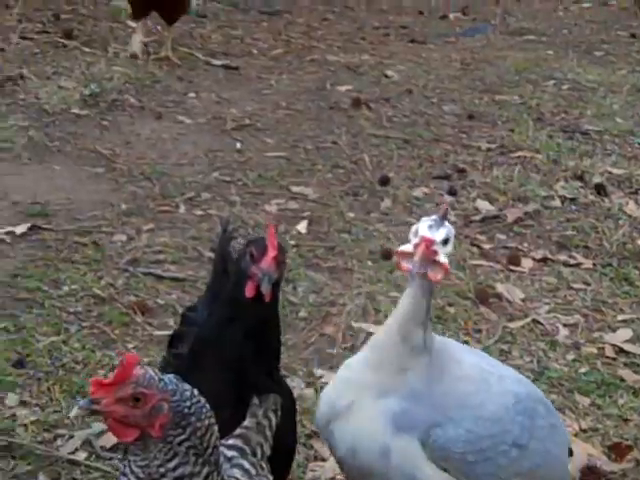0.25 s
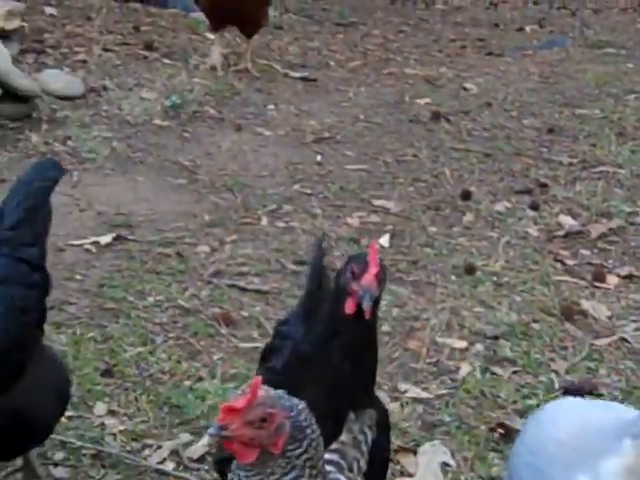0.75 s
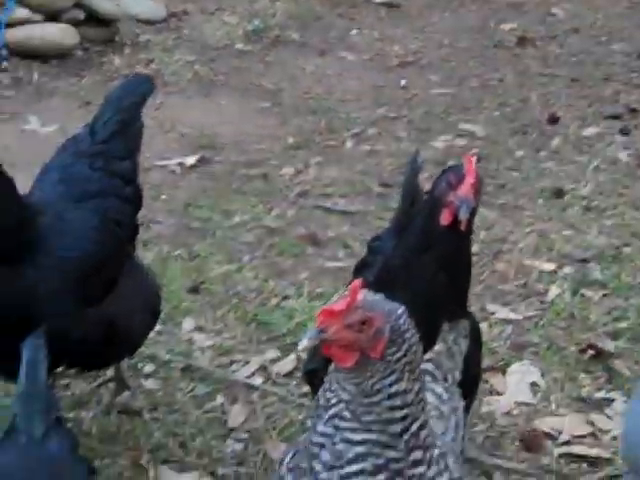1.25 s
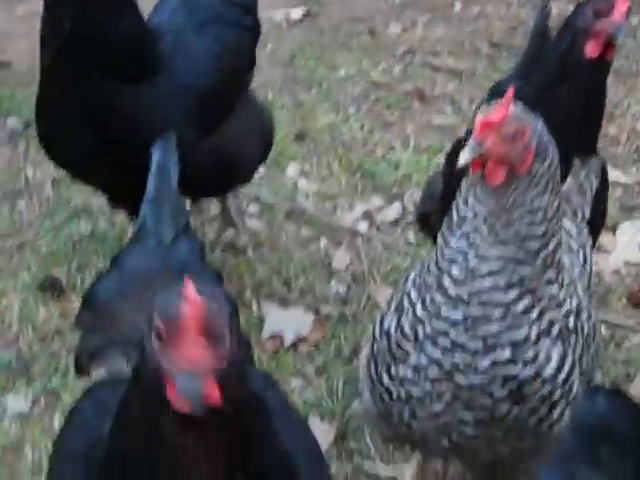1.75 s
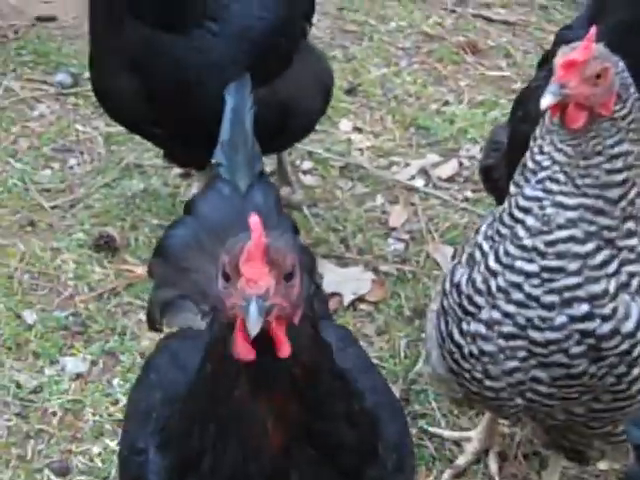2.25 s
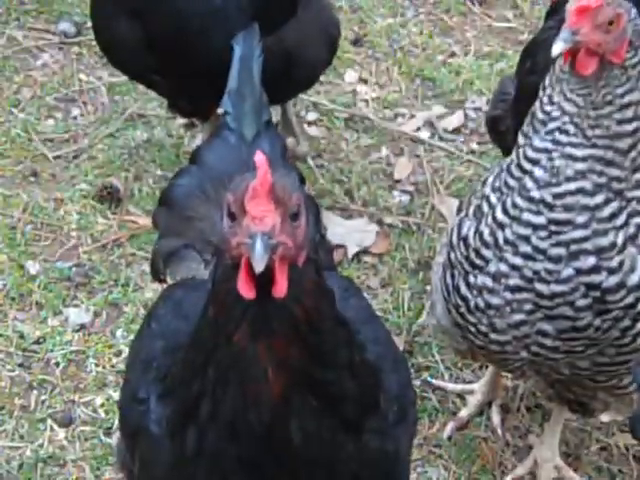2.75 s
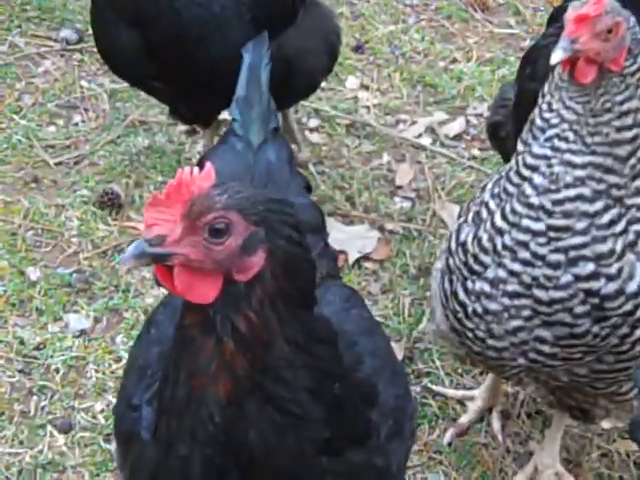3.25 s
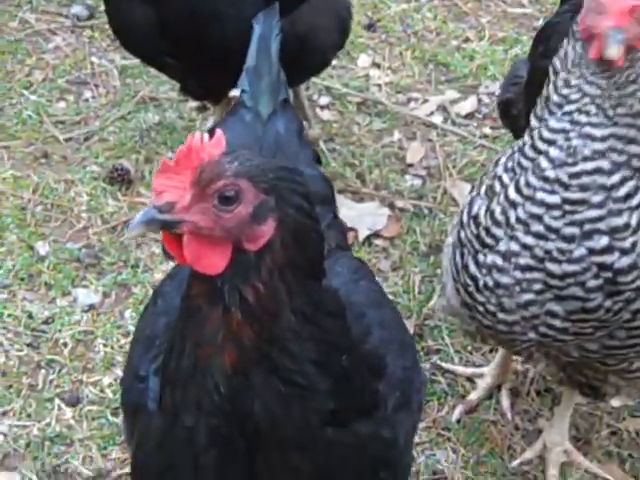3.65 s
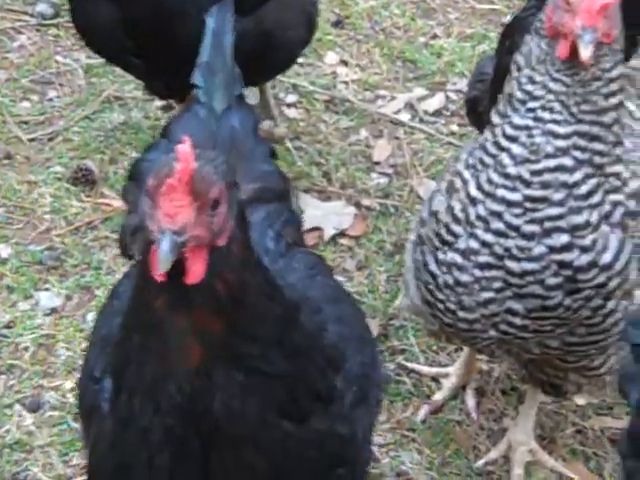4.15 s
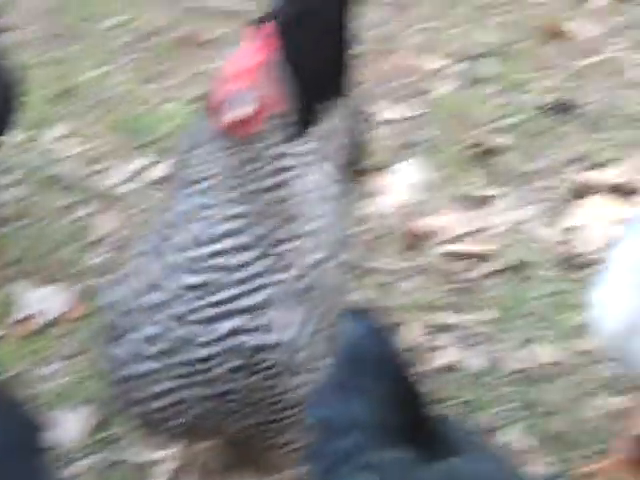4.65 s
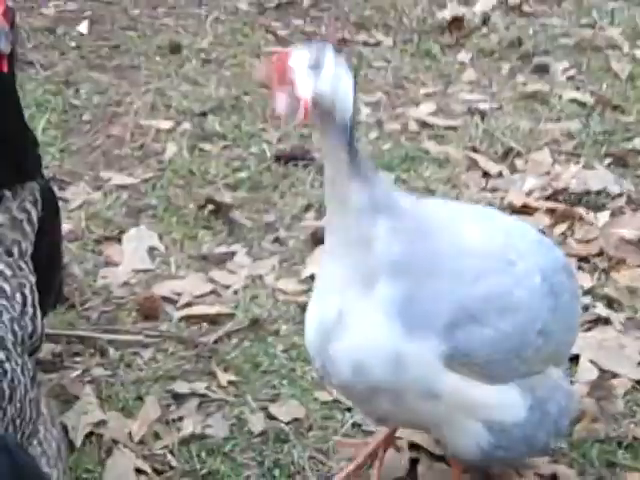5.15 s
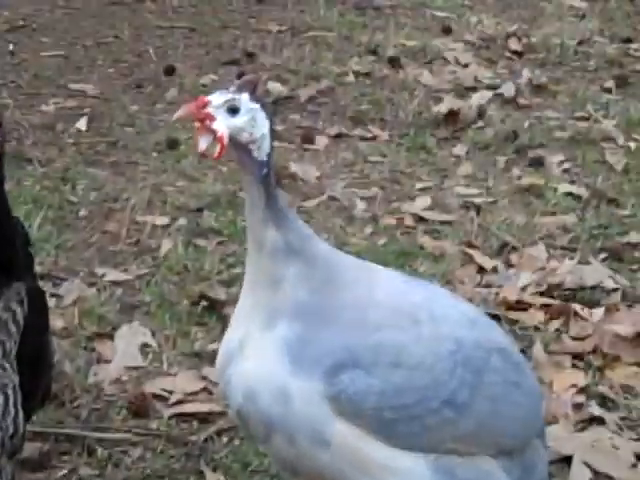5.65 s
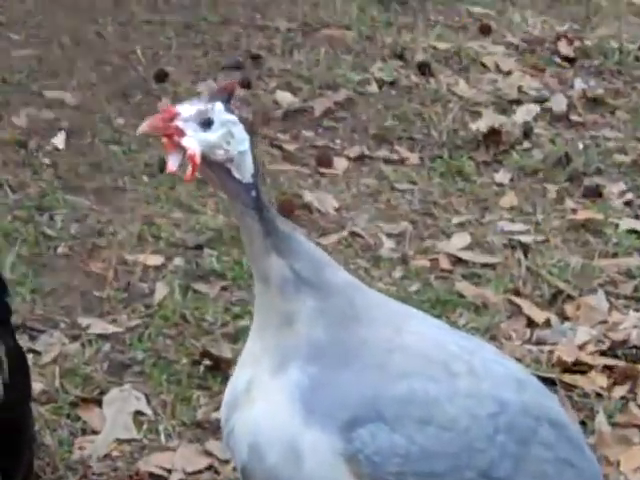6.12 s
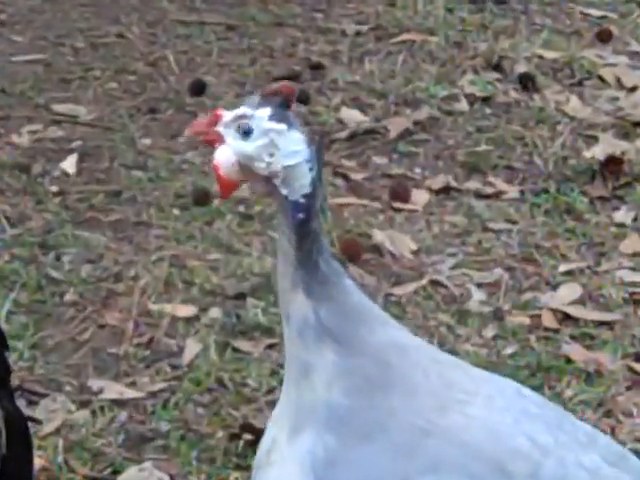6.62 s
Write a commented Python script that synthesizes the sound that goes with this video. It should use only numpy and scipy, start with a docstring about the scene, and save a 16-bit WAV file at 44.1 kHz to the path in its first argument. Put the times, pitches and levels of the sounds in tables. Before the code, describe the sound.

A guineafowl gives sharp metallic chinks and then a run of dry rasps while hens cluck and whine softly over rustling dead leaves.

```python
"""Guineafowl and hens on leaf litter

A guineafowl's thin whistles climb into sharp metallic chinks; a run of dry rasps is clicks through a throat.
Hens cluck, peep, growl, squawk and whine: harmonics of a rough syrinx, filtered by a throat.
Feet rustle in dead leaves (uneven clicks) over a low distant rumble (shaped noise).
The yard returns a faint echo, and two microphone ports hear it all in stereo."""
import sys
import numpy as np
from scipy import signal
from scipy.fft import rfft, irfft, next_fast_len
from scipy.io import wavfile

SR = 44100
rng = np.random.default_rng(int(sys.argv[2]) if len(sys.argv) > 2 else 0)


def wav_record(signal):
    """Record a signal, one row per channel, as 16-bit PCM in the file named by sys.argv[1]."""
    frames = np.transpose(np.atleast_2d(signal))
    bounded = np.clip(frames, -1, 1)
    # unit amplitude maps onto the largest positive 16-bit level
    quanta = np.round(bounded * 32767).astype(np.int16)
    wavfile.write(sys.argv[1], SR, quanta)


N = 303408


def undb(db):
    """Decibels to gain."""
    return 10 ** (np.asarray(db) / 20)


def unit(x):
    """Scale to rms 1."""
    return x / np.sqrt(np.mean(x ** 2) + 1e-18)


def shape_db(hz, points):
    """Read a spectrum on a log-frequency axis."""
    point_hz, point_db = np.transpose(points)
    return np.interp(np.log(np.maximum(hz, 1)), np.log(point_hz), point_db)


def response(points, size=1024):
    """Gain and phase of a causal (minimum-phase) filter with the given spectrum."""
    gain = undb(shape_db(np.fft.rfftfreq(size, 1 / SR), points))
    cepstrum = irfft(np.log(gain))
    cepstrum[1:size // 2] *= 2
    cepstrum[size // 2 + 1:] = 0
    return np.exp(rfft(cepstrum))


def colour(x, points):
    """Filter x with the given spectrum."""
    return signal.fftconvolve(x, irfft(response(points)))[:len(x)]


def wander(n, rate_hz):
    """Smooth chance with spread near 1, taking a new target rate_hz times a second."""
    place = np.arange(n) * rate_hz / SR
    return 1.23 * np.interp(place, np.arange(n), rng.standard_normal(n))


def crackle(n, spread_db):
    """Dense tiny clicks of very unequal size."""
    size_db = spread_db * np.minimum(rng.exponential(size=n), 2 * np.pi)
    return unit(rng.standard_normal(n) * undb(size_db))


def arch(u, start, middle, end):
    """Parabola through three values as u goes from 0 to 1."""
    return start * (1 - u) * (1 - 2 * u) + 4 * middle * u * (1 - u) + end * u * (2 * u - 1)


def add(out, start_s, x):
    """Mix x into out from start_s."""
    i = max(int(start_s * SR), 0)
    out[..., i:i + x.shape[-1]] += x[..., :max(N - i, 0)]


def ports(x, lag):
    """A sound from the right reaches the left port lag samples later."""
    size = next_fast_len(len(x) + 64)
    delay = np.exp(-2j * np.pi * np.fft.rfftfreq(size) * lag)
    late = irfft(rfft(x, size) * delay, size)
    return np.array([late[:len(x)], x])


def voice(hz, throat, rough, tilt_db=0, overtones_db=0, jitter=0.027, shimmer=0.2, half=0.13, count=16):
    """Harmonics of a syrinx through a throat; roughness shakes the cycles and alternates strong and weak."""
    shake, flutter = (np.resize(wander(SR // 4, np.mean(hz)), len(hz)) for _ in range(2))
    phase = 2 * np.pi * np.cumsum(hz * (1 + jitter * rough * shake)) / SR
    k = np.arange(1, count + 1)[:, None]
    tract = response(throat)
    tract_hz = np.linspace(0, SR / 2, len(tract))
    source_gain = undb(tilt_db * np.log2(k) + overtones_db * (k > 1))
    gain = np.interp(k * hz, tract_hz, tract, right=0) * source_gain
    tone = np.sum(gain * np.exp(1j * k * phase), axis=0).real
    # cos(phase / 2) makes every other cycle weaker
    return unit(tone * (1 + rough * (shimmer * flutter + half * np.cos(phase / 2))))


# guineafowl throat: freq_hz, gain_db
GUINEA_THROAT = [(500, -35), (900, -21), (1250, -1.5), (1800, -24), (2500, 0), (3700, 0), (4900, -10.5),
                 (6200, -13), (7200, -19), (8500, -10), (10200, -33), (15000, -54)]
# turbulent air in the guineafowl's call: freq_hz, gain_db
GUINEA_HISS = [(500, -22), (1600, -12), (2100, -14), (2900, 0), (4500, -1), (6000, -12), (8500, -9),
               (10500, -24), (15000, -40)]


def guinea_hiss(n):
    """Breath turbulence: noise coloured by the call's own spectrum."""
    return unit(colour(rng.standard_normal(SR // 8), GUINEA_HISS))[:n]


# thin whistles, most leading into a chink: start_s, length_s, start_hz, top_hz, end_hz, level_db, swell_db
WHISTLES = [(0.601, 0.021, 1785, 2320, 2650, -24, 26), (1.561, .040, 1838, 3310, 3288, -12, 29),
            (2.16, .044, 5900, 7460, 5140, -49, 0), (3.269, .039, 1694, 3453, 3933, -14, 22),
            (4.997, 0.019, 3600, 3882, 3000, -28, 24), (6.707, 0.038, 1900, 3450, 3330, -9.5, 33)]
WHISTLE_HISS_DB = -19
UNDERTONE_HZ, UNDERTONE_DB = 1470, -20  # the other side of the syrinx


def whistles():
    """A near-sine follows a pitch arch and swells, with faint overtones, a fixed undertone and hiss."""
    out = np.zeros(N)
    for start_s, length_s, start_hz, top_hz, end_hz, level_db, swell_db in WHISTLES:
        u = np.linspace(0, 1, int(length_s * SR))
        hz = arch(u, start_hz, top_hz, end_hz) * (1 + .016 * wander(len(u), 1500))
        phase = 2 * np.pi * np.cumsum(hz) / SR
        gate = np.clip(np.minimum(u, 1 - u) / .1, 0, 1)
        # stutters at first, steadies towards the end
        swell = undb(level_db + (u - 1) * (swell_db + 4 * wander(len(u), 600))) * gate
        tone = np.sin(phase) + undb(UNDERTONE_DB) * np.sin(2 * np.pi * UNDERTONE_HZ * u * length_s)
        for k in (2, 3):
            gain = undb(shape_db(k * hz, GUINEA_THROAT) / 2 - 4.5 * k)
            tone += gain * np.sin(k * phase) * (k * hz < SR / 2)
        add(out, start_s, swell * (np.sqrt(2) * tone + undb(WHISTLE_HISS_DB) * guinea_hiss(len(u))))
    return out


# chinks: start_s, length_s, attack_hz, held_hz, level_db, peak_place_0_to_1, overtones_db,
# brightness_db_per_octave, rasp_0_to_1, echo_db
CHINKS = [(0.616, 0.029, 1330, 1285, -16, 0.5, -6, -1.5, 0.15, -4),
          (1.598, .017, 1285, 1215, -10.3, 0.32, -4, 2.3, 0.3, -6),
          (3.304, 0.022, 1496, 1195, -8, 0.27, -11.5, 3.2, 0.15, -7),
          (4.762, 0.034, 1262, 1246, -11.7, 0.54, 1.5, -1.5, 0.06, -9),
          (5.013, 0.017, 1600, 1290, -20, .5, -3.5, 3.2, 0.18, 8),
          (6.742, 0.02, 1480, 1200, -8.2, 0.27, -11.5, 4.2, 0.3, -5)]
CHINK_HISS_DB = -3  # at rasp 1


def chinks():
    """Short hoarse notes: pitch settles from attack to held; returns the notes and their send to the yard."""
    out, thrown = np.zeros((2, N))
    for start_s, length_s, attack_hz, held_hz, level_db, peak, overtones_db, bright_db, rasp, echo_db in CHINKS:
        u = np.linspace(0, 1, int(length_s * SR))
        hz = held_hz + (attack_hz - held_hz) * np.exp(-u / .27)
        swell = np.sin(np.pi * np.interp(u, [0, peak, 1], [0, .5, 1])).clip(0) ** 1.3
        tone = voice(hz, GUINEA_THROAT, rasp, bright_db, overtones_db,
                     jitter=0.1, shimmer=0.66, half=0.1, count=10)
        breath = rasp * undb(CHINK_HISS_DB) * guinea_hiss(len(u))
        note = undb(level_db) * swell * (tone + breath)
        add(out, start_s, note)
        # a call aimed away from the ports puts more into the yard
        add(thrown, start_s, undb(echo_db) * note)
    return out, thrown


def guineafowl():
    """Thin whistles and loud chinks about a third as high, with their own yard echo."""
    whistle = whistles()
    chink, thrown = chinks()
    thrown = thrown + undb(-13) * whistle
    echo = yard(ports(thrown, lag=0), early_db=-21.5, late_db=-27.5, early_t60=.1, late_t60=0.7)
    return ports(whistle + chink, lag=2.9) + echo


# dry rasps, the first four the ragged noise and scuffle around the squawk:
# start_s, rise_s, hold_s, decay_s, level_db, throat_ring_hz, ring_db
RASPS = [(4.102, 0.0012, 0.058, 0.0085, -32.5, 3080, -7), (4.114, 0.002, 0.007, 0.018, -24.5, 880, 20),
         (4.117, 0.001, 0.0023, 0.0029, -15.5, 2870, 16), (4.15, 0.001, 0.0029, 0.0013, -19.5, 2500, -4),
         (4.3411, 0.0011, 0.009, 0.007, -19, 1720, -8), (4.5436, 0.0015, 0.0028, 0.012, -17.3, 2050, -13),
         (4.7426, 0.0003, 0.013, 0.0024, -19, 2400, -7), (4.9602, 0.0019, 0.005, 0.011, -18.5, 2200, -7.5),
         (5.1925, 0.0004, 0.007, 0.008, -18, 2120, -4), (5.446, 0.041, 0.014, 0.009, -26, 2110, -2)]
# hiss of a rasp: freq_hz, gain_db
RASP_HISS = [(150, -49), (600, -11), (1000, -9), (1500, -5), (3300, -8), (4500, 1.5), (5400, 1.5),
             (6500, 7), (8200, 0.5), (10000, -5.5), (12000, -27), (15000, -42)]
RASP_FLUTTER_HZ, RASP_LAG_SAMPLES = 330, 3.1  # typical puff rate; lateness at the left port


def rasps():
    """Toneless harsh bursts: uneven puffs of clicks give a bright hiss and ring one resonance."""
    out, t = np.zeros((2, N)), np.arange(SR // 7) / SR
    for start_s, rise_s, hold_s, decay_s, level_db, ring_hz, ring_db in RASPS:
        attack = undb(level_db) * np.minimum(t / rise_s, 1) ** 1.06
        release = np.exp(-np.maximum(t - rise_s - hold_s, 0) / decay_s)
        flutter_hz = RASP_FLUTTER_HZ * np.exp(0.083 * wander(len(t), 300))
        cycle = np.cumsum(flutter_hz) / SR % 1
        puffs = unit(undb(-16 * cycle))
        clicks = crackle(len(t), 1.2) * puffs * undb(1.5 * wander(len(t), 900))
        throat = signal.iirpeak(ring_hz, 2.1, fs=SR)
        ring = unit(signal.lfilter(*throat, signal.lfilter(*throat, clicks)))
        # the hiss cracks first, the ring builds up behind it
        ring = undb(ring_db + 2.5) * (1 - np.exp(-t / .003)) * ring
        sound = release * (unit(colour(clicks, RASP_HISS)) + ring)
        # hiss scattered off the ground, different at each port
        scatter = np.array([unit(colour(rng.standard_normal(len(t)), RASP_HISS)) for _ in range(2)])
        direct = ports(attack * sound / np.hypot(1, undb(ring_db)), RASP_LAG_SAMPLES)
        add(out, start_s, direct + undb(-6) * attack * release * scatter)
    return out


HEN_ATTACK_S, HEN_RELEASE_S, QUIVER_SHARE, QUIVER_DB = 0.0012, 0.003, 0.014, 1.9


def hen_note(length_s, start_hz, end_hz, level_db, swell_db, throat, bend, rough, tilt_db):
    """One hen note: the pitch bends from start to end and quivers along with the loudness."""
    u = np.linspace(0, 1, int(length_s * SR))
    attack = np.clip(u * length_s / HEN_ATTACK_S, 0, 1)
    release = np.clip((1 - u) * length_s / HEN_RELEASE_S, 0, 1)
    quiver = wander(len(u), 40)
    hz = (start_hz + (end_hz - start_hz) * u ** bend) * (1 + QUIVER_SHARE * quiver)
    note = voice(hz, throat, rough, tilt_db=tilt_db, jitter=.12, shimmer=1.0, half=0.67, count=24)
    return note * attack * release * undb(level_db + swell_db * (u - .5) + QUIVER_DB * quiver)


# gruff clucks, and last a small peck or tick: start_s, length_s, start_hz, end_hz, level_db, swell_db
CLUCKS = [(0.238, 0.052, 650, 830, -33, -10), (0.37, 0.033, 560, 620, -32.5, -3),
          (0.506, 0.033, 328, 430, -32.5, -8), (0.654, 0.04, 335, 430, -34, -11),
          (0.882, 0.035, 335, 490, -30, -5), (1.03, 0.034, 338, 560, -29, 0),
          (1.139, 0.02, 436, 480, -40, -12), (1.208, 0.035, 355, 590, -26, 4),
          (5.69, 0.008, 520, 450, -35, -8)]
# falling squeaks, most at the end of a cluck: start_s, length_s, start_hz, end_hz
SQUEAKS = [(0.403, 0.023, 950, 790), (0.537, 0.038, 1040, 780), (0.774, 0.03, 970, 500),
           (0.915, 0.026, 1130, 760), (1.062, 0.03, 1080, 520), (1.242, 0.022, 1050, 590)]
# clear peeps: start_s, length_s, start_hz, end_hz, level_db, swell_db
PEEPS = [(0.693, 0.066, 760, 560, -36.5, 11), (0.754, 0.024, 735, 810, -35, 5),
         (3.261, 0.072, 688, 910, -33.5, 15.5), (4.213, 0.014, 826, 850, -39, -4),
         (4.274, 0.009, 880, 810, -45, 0), (5.915, 0.027, 795, 820, -48, 6.5),
         (6.091, 0.095, 1446, 1460, -56, -4.5)]
# low croons and growls: start_s, length_s, start_hz, end_hz, level_db, swell_db
GROWLS = [(2.096, 0.098, 266, 253, -36.5, -2), (2.188, 0.098, 288, 312, -40.5, -3),
          (3.711, 0.072, 110, 116, -43.5, 9), (3.855, 0.061, 126, 105, -49, -18),
          (4.163, 0.048, 290, 205, -35, 5)]
# one harsh squawk: start_s, length_s, start_hz, end_hz, level_db, swell_db
SQUAWK = (4.112, 0.05, 460, 310, -26.5, -9)
# throats, the last two with beak shut and beak wide open: freq_hz, gain_db
HEN_THROAT = [(100, -4), (250, -5.5), (380, -4), (540, -0.5), (680, 6), (930, -6), (1220, 1.5), (1600, -10),
              (1900, -11.5), (2300, -26), (2650, -17), (3200, -28), (3800, -20), (4500, -33), (5300, -23),
              (6000, -32), (7200, -24), (9000, -45)]
GROWL_THROAT = [(110, -11), (240, -3), (340, -10), (520, -11), (780, 1.5), (930, -4), (1040, -3),
                (1300, -15), (1560, -18), (2100, -38), (4000, -48)]
SQUAWK_THROAT = [(200, -25), (450, -13), (620, -2), (860, 6), (1050, -4), (1250, -3), (1700, -11),
                 (2300, -13), (3000, -7), (4000, -13), (5000, -21), (8000, -30)]
CLUCK_BEND, SQUEAK_BEND, PEEP_BEND = 2.4, 2.1, 2.1  # powers above 1: the pitch moves late in the note
GRUFF_HZ, HIGH_CLUCK_TILT_DB = 340, -8  # extra dB/octave per octave of start pitch above gruff
SQUEAK_DB = -39


def hens():
    """Gruff clucks and a small peck, falling squeaks, clear peeps, low growls and a squawk."""
    out = np.zeros(N)
    for start_s, *note in CLUCKS:
        tilt_db = 0.5 + HIGH_CLUCK_TILT_DB * np.log2(note[1] / GRUFF_HZ)
        add(out, start_s, hen_note(*note, HEN_THROAT, CLUCK_BEND, rough=0.18, tilt_db=tilt_db))
    for start_s, *note in SQUEAKS:
        add(out, start_s, hen_note(*note, SQUEAK_DB, swell_db=-4, throat=HEN_THROAT,
                                   bend=SQUEAK_BEND, rough=0.25, tilt_db=-5))
    for start_s, *note in PEEPS:
        add(out, start_s, hen_note(*note, HEN_THROAT, PEEP_BEND, rough=0.05, tilt_db=-2.5))
    for start_s, *note in GROWLS:
        add(out, start_s, hen_note(*note, GROWL_THROAT, bend=1, rough=0.17, tilt_db=0))
    start_s, *note = SQUAWK
    add(out, start_s, hen_note(*note, SQUAWK_THROAT, bend=0.4, rough=0.9, tilt_db=0))
    return ports(out, lag=2.8)


# whining hen at rest between pushes: time_s, pitch_hz, level_db
WHINE = [(2.3, 720.4, -48.5), (2.43, 700, -54), (2.5, 715, -40), (2.585, 721.6, -39.5), (2.74, 739, -35.5),
         (2.895, 752, -36), (3.06, 772, -32.5), (3.148, 775, -33.5), (3.165, 700, -55)]
# pushes of effort: centre_s, width_s
PUSHES = [(2.361, 0.018), (2.466, 0.016), (2.532, 0.04), (2.629, 0.034), (2.684, 0.048), (2.789, 0.048),
          (2.848, 0.042), (2.948, 0.048), (3.007, 0.043), (3.11, 0.07)]
# throat of the whine: freq_hz, gain_db
WHINE_THROAT = [(800, 9.5), (950, 3.5), (1480, -8), (1750, -28), (2500, -27.5), (3400, -27.5), (4200, -42),
                (5500, -39), (7000, -50)]
PUSH_RISE_HZ, PUSH_DB_PER_HZ = 121, 0.071  # rise at full effort; loudness per hertz of rise
WARM_UP_S = 0.18  # time constant of the effort


def whine():
    """A nearly pure tone climbs as it grows; pushes raise pitch and loudness together, so it quavers."""
    time_s, pitch_hz, level_db = np.transpose(WHINE)
    t = np.arange(time_s[0], time_s[-1], 1 / SR)
    gate = np.clip(np.minimum(t - time_s[0], time_s[-1] - t) / 0.0033, 0, 1)
    effort = 1 - np.exp(-(t - time_s[0]) / WARM_UP_S)
    push = sum(.5 ** (np.abs(2 * (t - centre_s) / width_s) ** np.pi) for centre_s, width_s in PUSHES)
    rise_hz = PUSH_RISE_HZ * effort * push
    hz = (np.interp(t, time_s, pitch_hz) + rise_hz) * (1 + .008 * wander(len(t), 110))
    flicker = undb(1.9 * wander(len(t), 80))
    force = undb(np.interp(t, time_s, level_db) + PUSH_DB_PER_HZ * rise_hz) * flicker
    out = np.zeros(N)
    add(out, time_s[0], voice(hz, WHINE_THROAT, rough=.09, count=8) * gate * force)
    return ports(out, lag=4.2)


# background rustle of the shuffling flock, rising and sinking, before flutter: time_s, level_db
SHUFFLE = [(0.0, -53), (1.1, -56), (2.0, -62), (3.0, -67), (3.8, -59), (4.8, -68), (6.1, -72), (6.88, -63)]
# feet scuffing through the leaves, before flutter: loudest_s, rise_s, decay_s, level_db
SCUFFS = [(0.245, 0.01, 0.012, -43), (0.372, 0.006, 0.03, -44), (0.43, 0.03, 0.01, -42),
          (0.555, 0.025, 0.02, -49), (0.70, 0.04, 0.09, -45), (0.925, 0.015, 0.01, -43),
          (0.97, 0.012, 0.018, -44), (1.10, 0.03, 0.04, -46), (1.235, 0.015, 0.012, -48),
          (1.49, 0.015, 0.03, -46), (1.57, 0.04, 0.06, -47), (2.17, 0.004, 0.08, -54.5),
          (3.525, 0.006, 0.025, -50), (3.59, 0.016, 0.016, -33.5), (3.68, 0.018, 0.014, -41),
          (3.76, 0.04, 0.09, -51), (4.195, 0.009, 0.024, -31.5), (4.42, 0.04, 0.06, -50),
          (4.955, 0.012, 0.01, -45), (5.25, 0.015, 0.035, -42), (5.385, 0.025, 0.025, -42),
          (5.61, 0.05, 0.1, -55), (6.26, 0.01, 0.03, -55), (6.39, 0.033, 0.032, -37),
          (6.64, 0.04, 0.025, -58)]
# loudest leaves snapping underfoot: start_s, level_db
SNAPS = [(0.0913, -31), (0.1433, -30), (0.407, -30), (0.7016, -31), (1.0885, -33), (1.1245, -33),
         (1.6955, -37.5), (1.8462, -40.5), (3.5744, -25), (4.1815, -19), (4.5693, -19), (5.3976, -34),
         (5.5184, -32), (5.6925, -35)]
# dry leaves: freq_hz, gain_db
LEAVES = [(300, -4), (1500, -9.5), (3500, -8.5), (5000, -7), (6600, 3.5), (8300, 2.5), (10500, -8.5),
          (14500, -24)]
SNAP_DECAY_S = 0.0023
TICK_COUNT, TICK_DB = 60, 15  # greatest level over the shuffle


def leaves():
    """Feet in dead leaves: crackle under a force that swells with scuffs and jumps with snaps and ticks."""
    t = np.arange(N) / SR
    shuffle = undb(np.interp(t, *np.transpose(SHUFFLE)))
    power = shuffle ** 2
    for loudest_s, rise_s, decay_s, level_db in SCUFFS:
        away = np.minimum(np.maximum((loudest_s - t) / rise_s, (t - loudest_s) / decay_s), 20)
        power = power + (undb(level_db) * np.exp(-away)) ** 2
    force = np.sqrt(power) * undb(2.7 + 2.6 * wander(N, 170))
    snap = np.exp(-t[:SR // 16] / SNAP_DECAY_S)
    for start_s, level_db in SNAPS:
        add(force, start_s, undb(level_db - 1) * snap)
    for place, size in rng.random((TICK_COUNT, 2)):
        add(force, place * N / SR, size * undb(TICK_DB) * shuffle[int(place * N)] * snap)
    shared, left, right = (unit(colour(crackle(N, 3), LEAVES)) for _ in range(3))
    return force * (0.63 * ports(shared, lag=2.7) + 0.57 * np.array([left, right]))


# distant rumble and air, relative density: freq_hz, density_db
AIR = [(15, -50), (25, -20), (60, -6.5), (98, 3), (145, 0), (205, -4.3), (314, -14), (697, -17),
       (818, -15.5), (1040, -15.5), (1470, -16.5), (1590, -20), (2080, -25), (4150, -37), (5200, -38),
       (8070, -31), (14500, -50.5)]
AIR_LEVEL_DB = -47.8  # of the part shared by both ports, before the swell
RUMBLE_SWELL_DB, RUMBLE_SWELL_HZ = 0.7, 7


def air():
    """Shaped noise: a restless distant rumble, nearly alike at both ports, under a faint hiss that is not."""
    hz = np.fft.rfftfreq(N, 1 / SR)
    gain = undb(shape_db(hz, AIR))
    side_share = np.clip(0.13 + hz / 6000, 0, 1)
    mid = irfft(rfft(rng.standard_normal(N)) * gain, N)
    side = irfft(rfft(rng.standard_normal(N)) * gain * side_share, N)
    both = undb(AIR_LEVEL_DB) * np.array([mid + side, mid - side]) / np.std(mid)
    bass = signal.sosfiltfilt(signal.butter(2, 300, fs=SR, output="sos"), both)
    return both + bass * (undb(RUMBLE_SWELL_DB * wander(N, RUMBLE_SWELL_HZ)) - 1)


def yard(x, early_db=-29, late_db=-31, early_t60=0.067, late_t60=0.81):
    """Near things answer within a few hundredths of a second; trees and walls add a thin, longer tail."""
    t = np.arange(SR) / SR
    echo_colour = [(300, 2), (1200, 1), (3700, 1.5), (7000, 6.5), (14000, -1)]  # freq_hz, gain_db
    wet = []
    for channel in x:
        echo = np.zeros(SR)
        for level_db, t60_s in ((early_db, early_t60), (late_db, late_t60)):
            tail = crackle(SR, 1.5) * (t > .016) * undb(-60 * t / t60_s)
            echo += undb(level_db) * tail / np.linalg.norm(tail)
        wet.append(signal.fftconvolve(channel, colour(echo, echo_colour))[:N])
    return np.array(wet)


def scene():
    """All the birds, the leaves, their echo and the outdoor air."""
    flock = hens() + whine() + rasps() + leaves()
    return guineafowl() + flock + yard(flock) + air()


# colour of each microphone port: freq_hz, gain_db
LEFT_PORT = [(1000, -1.2), (4500, 5.2), (6300, -1.5), (8200, 6.5), (10000, 1.5), (14000, 8.5)]
RIGHT_PORT = [(1000, -1.7), (4500, 5.7), (6500, 4.3), (8200, -7), (10000, -6), (14000, 3.5)]
TOP_HZ = 14400


def record(dry):
    """Each port has its own treble colour; loud peaks bend lopsidedly and clip; a low-pass ends the band."""
    x = np.array([colour(dry[0], LEFT_PORT), colour(dry[1], RIGHT_PORT)])
    x = np.clip(x + 0.012 * x ** 2, -1, 1)
    return signal.sosfilt(signal.ellip(10, .2, 80, TOP_HZ, fs=SR, output="sos"), x)


dry = scene()
out = record(dry)
wav_record(out)
```